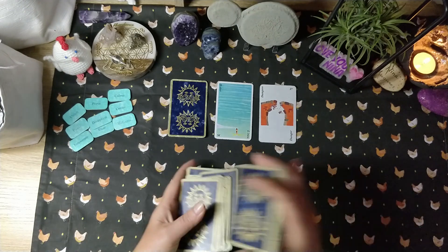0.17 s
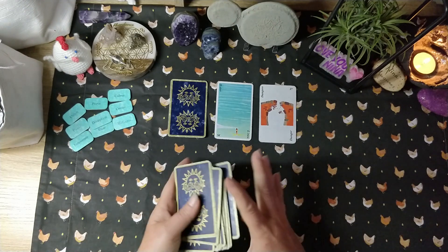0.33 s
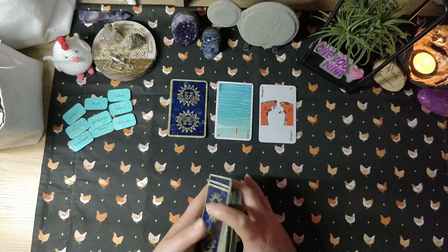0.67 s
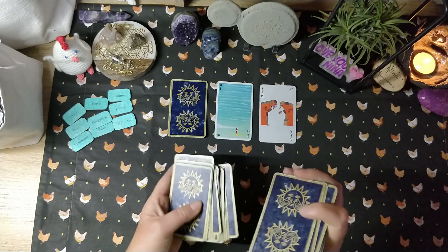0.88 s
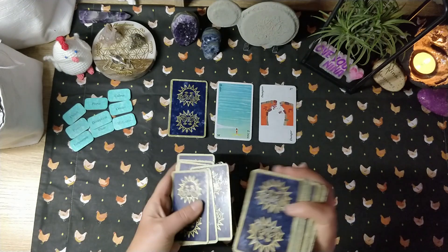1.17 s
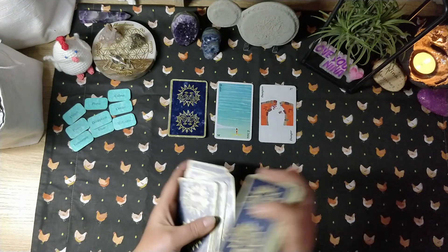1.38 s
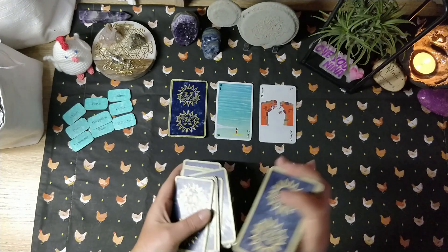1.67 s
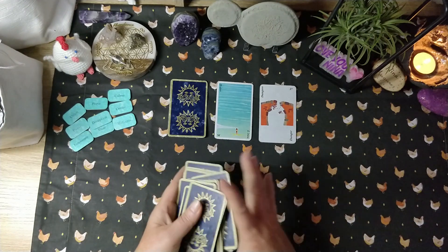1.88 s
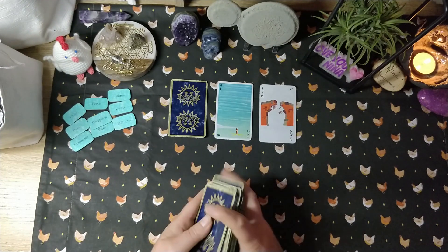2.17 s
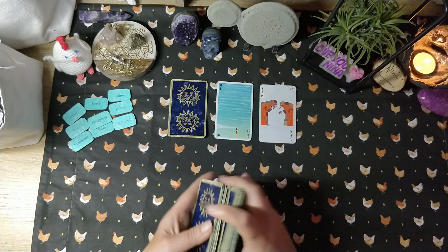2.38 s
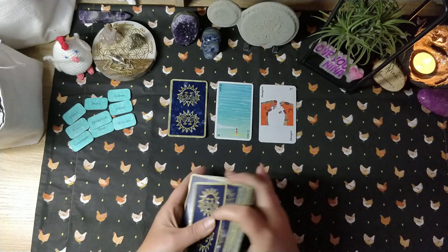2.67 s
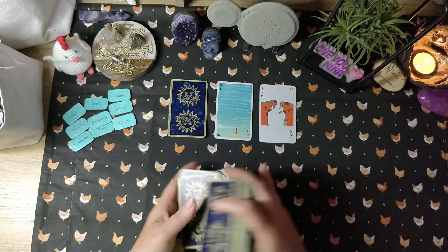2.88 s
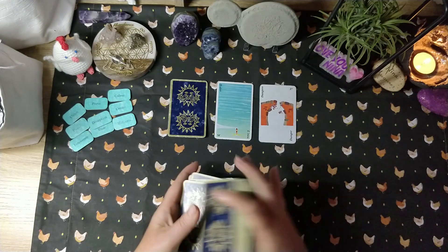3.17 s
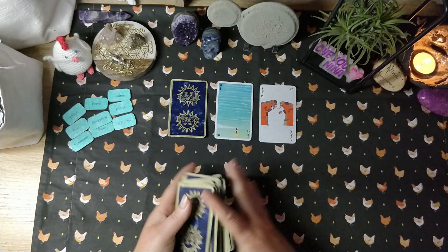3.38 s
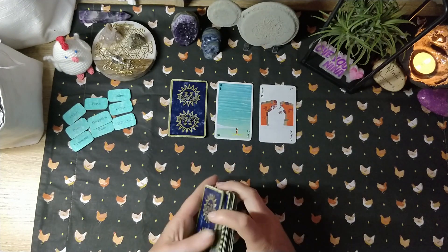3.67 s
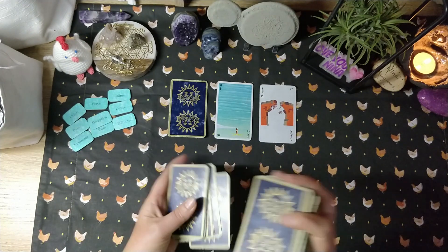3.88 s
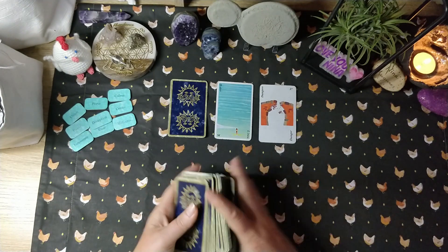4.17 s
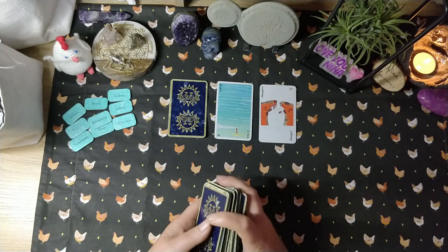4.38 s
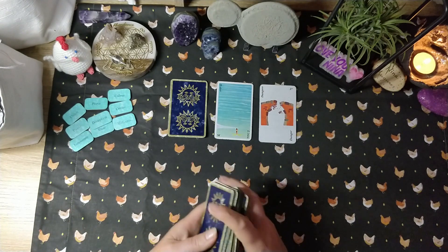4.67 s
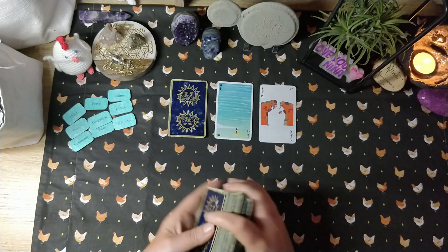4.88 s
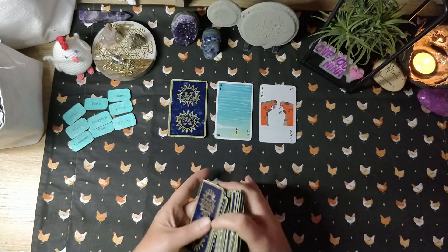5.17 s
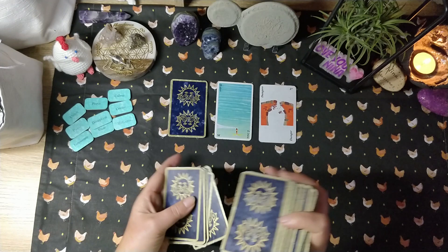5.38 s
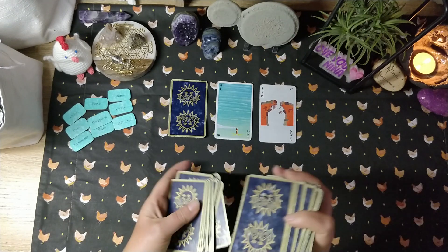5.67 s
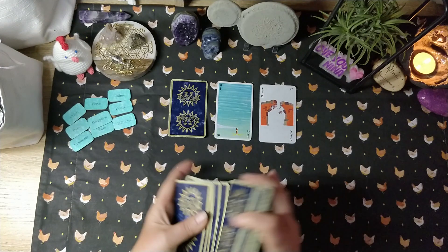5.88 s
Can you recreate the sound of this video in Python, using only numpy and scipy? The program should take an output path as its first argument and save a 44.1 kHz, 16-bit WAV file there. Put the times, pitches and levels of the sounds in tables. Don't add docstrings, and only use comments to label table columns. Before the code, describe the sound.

Two hands shuffle a stiff deck of cards close to the microphone in a small quiet room. Packets land with sharp, hollow slaps in irregular clusters, preceded by quick grainy slides. Corners tick past fingers and heavier drops knock the deck and palm. The middle is busiest; after four seconds comes a softer stretch of faint ticks, then hard slaps return at the end.

```python
import sys
import numpy as np
from scipy import signal
from scipy.fft import rfft, irfft
from scipy.io import wavfile
from scipy.ndimage import uniform_filter1d

SR = 44100
rng = np.random.default_rng(int(sys.argv[2]) if len(sys.argv) > 2 else 0)


def wav_out(sig):
    wavfile.write(sys.argv[1], SR, np.round(np.clip(np.atleast_2d(sig).T, -1, 1) * 32767).astype(np.int16))


def level_to_linear(level):
    exponent = np.asarray(level, float) / 20
    return 10 ** exponent


N = 266143


def band(x, lo_hz, hi_hz, order=2):
    edges_hz = [lo_hz, min(hi_hz, .45 * SR)]
    return signal.sosfilt(signal.butter(order, edges_hz, "band", fs=SR, output="sos"), x)


def ring(x, hz, width_hz):
    r = np.exp(-np.pi * width_hz / SR)
    return signal.lfilter([1 - r, 0, r - 1], [1, -2 * r * np.cos(2 * np.pi * hz / SR), r * r], x)


def unit(x):
    return x / np.sqrt(np.mean(x ** 2))


def crest(x):
    return x / np.sqrt(2 * uniform_filter1d(x ** 2, size=66).max())


def walk(rate):
    k = int(SR / rate)
    return unit(uniform_filter1d(uniform_filter1d(rng.standard_normal(N), k), k))


def curve(table, column):
    rows = np.array(table)
    return np.interp(np.arange(N) / SR, rows[:, 0], rows[:, column])


def add(out, start_s, x):
    i = max(int(start_s * SR), 0)
    out[i:i + len(x)] += x[:len(out) - i]


def airy(x):
    humps = level_to_linear(9.5) * ring(x, 6495, 1370) + level_to_linear(0.5) * ring(x, 8570, 1300)
    return humps + level_to_linear(-11.0) * band(x, 9200, 20000)


# pitch_hz, level_db [dB per Hz]
STILL_AIR = [(18, -18.5), (30, -8.5), (98, -5), (260, -15), (400, -14.5), (979, -15.5), (14800, -62),
             (16500, -55.5)]
# pitch_hz, width_hz, level_db
DRONES = [(132, 2.8, -66.5), (184.4, 12, -74)]


def room_tone():
    hz, (air_hz, air_db) = np.fft.rfftfreq(N, 1 / SR), np.transpose(STILL_AIR)
    shape = level_to_linear(np.interp(np.log(hz + 1), np.log(air_hz), air_db))
    air = irfft(rfft(rng.standard_normal(N)) * shape, N)
    mains_phase = 2 * np.pi * np.cumsum(50 + 0.94 * walk(4)) / SR
    mains = level_to_linear(-55.5 + 1.9 * walk(5)) * np.sin(mains_phase)
    drones = np.zeros(N)
    for pitch_hz, width_hz, level_db in DRONES:
        drone = ring(ring(rng.standard_normal(N), pitch_hz, width_hz), pitch_hz, width_hz)
        drones += level_to_linear(level_db) * unit(drone)
    return level_to_linear(-58.5 + 1.0 * walk(6.3)) * unit(air) + mains + drones


# start_s, speeding_up_ms, level_db, hiss_db [against level]
PUSHES = [(0.0, 55.4, -29.5, -5.5), (0.758, 38, -55, 1.5), (0.813, 29, -37.5, -4), (1.114, 30, -41, 0),
          (1.332, 33, -42.5, 6.5), (1.548, 100, -37, -23), (2.118, 40.3, -48.5, 2), (2.438, 46, -38.5, -1),
          (2.691, 50.4, -27.5, -10.5), (2.967, 12.6, -27.5, -25), (3.195, 4.9, -31.5, -5.5),
          (3.367, 21.6, -45, -1.5), (3.689, 87, -60.5, 7), (3.775, 23, -35, -1), (4.174, 53, -51.5, -1),
          (4.502, 42.3, -62, 12.5), (4.842, 31, -65, -4), (5.273, 39.5, -34, -4.5), (5.539, 75, -36.5, -24),
          (5.788, 28, -37, -1.5)]
# start_s, slowing_down_ms, level_db, hiss_db [against level]
DRAGS = [(0.387, 47, -48.5, 0.5), (1.001, 16.5, -33, -12), (1.052, 95, -45, -6.5), (1.809, 7, -37, -18),
         (1.837, 64, -50, -30.5), (2.009, 23, -42.5, -5), (2.988, 23, -37.5, -4), (3.227, 43, -44.5, -13),
         (4.267, 23, -58, 9.5), (4.308, 13, -49.5, -24), (4.44, 99, -60.5, -19), (4.876, 83, -51.5, -5.5),
         (5.107, 62, -50.5, -9), (5.228, 52, -59.5, 4), (5.495, 12, -34, -15), (5.722, 16, -80, 10),
         (5.832, 80, -40, -9)]
# start_s, length_ms, level_db, hiss_db [against level]
SWEEPS = [(0.517, 84, -53, -4), (2.181, 26, -55, 0), (3.476, 90, -62, 3), (4.06, 240, -63, -21.5),
          (4.636, 39, -56.5, 6), (0.44, 170, -67.5, -2), (1.7, 72, -63.5, -0.5), (2.06, 66, -60, -2.5),
          (2.385, 82, -71.5, 12), (4.752, 58, -72, 6.5), (4.964, 40, -56.5, 7.5), (5.018, 133, -56, -7)]


def strokes():
    rows = []
    for s, ms, db, hiss_db in PUSHES:
        touch_db = 0.5 - 0.03 * (db + 52.5)
        rows.append((s, ms, 2.1, db, hiss_db, touch_db))
    for s, ms, db, hiss_db in DRAGS:
        rows.append((s, 1.6, ms, db, hiss_db, -22.5))
    for s, ms, db, hiss_db in SWEEPS:
        rows.append((s, 0.5 * ms, 0.5 * ms, db, hiss_db, 6.5))
    return rows


# start_s, level_db
FUMBLE = [(0.0, -35.5), (0.57, -57.5), (0.84, -49.5), (1.23, -50.5), (1.39, -41.5), (1.51, -48),
          (2.05, -49), (2.2, -81.5), (2.6, -46.5), (2.85, -33.5), (3.01, -47), (3.41, -51.5), (3.76, -63),
          (3.93, -37), (4.08, -52.5), (5.1, -57), (5.55, -41.5), (6.03, -58)]
# pitch_hz, width_hz, level_db
PAPER = [(1481, 81, 0), (2100, 630, -2.5), (2950, 540, -9), (3950, 520, -12)]


def slides():
    gains = level_to_linear(curve(FUMBLE, column=1) - 16.0 + 2.0 * walk(49) + np.array([[0], [-.1], [-5]]))
    for start_s, rise_ms, fall_ms, level_db, hiss_db, touch_db in strokes():
        ms = np.arange(int((rise_ms + fall_ms + 22) * SR / 1000)) * 1000 / SR
        moments_ms = [0, rise_ms, rise_ms + fall_ms, ms[-1]]
        speed_db = np.interp(ms, moments_ms, [touch_db - 17.5, 0, -6, -24])
        stroke = np.minimum(ms / 12.0, 1) * level_to_linear(level_db + 2.5 + speed_db)
        shares_db = (-.3 * hiss_db - 5.0, 0.4 * hiss_db - 0.5, hiss_db)
        for gain, share_db in zip(gains, shares_db):
            add(gain, start_s, stroke * level_to_linear(share_db))
    grip_db = 2.8 * walk(110)
    rub = rng.standard_normal(N) * level_to_linear(grip_db + 0.72 * walk(550))
    skim = rng.standard_normal(N) * level_to_linear(grip_db + 0.72 * walk(550))

    def rustle(resonances):
        return unit(sum(level_to_linear(db) * ring(rub, hz, width_hz) for hz, width_hz, db in resonances))

    return gains[0] * rustle(PAPER[:2]) + gains[1] * rustle(PAPER[2:]) + gains[2] * unit(airy(skim))


# start_s, pocket_db [peak], pocket_hz, edge_db [against pocket], crack_db [against pocket]
LONG_EDGE = [(0.2489, -18, 2260, 5.5, -2.5), (0.2499, -19.5, 2190, -29, 3.5), (1.005, -28, 1800, -2, -5),
             (1.0474, -26.5, 1930, 3, -4), (1.1291, -13.5, 1060, -0.5, -1), (1.288, -13, 1900, -3, -5.5),
             (1.326, -24.5, 1880, 4.5, -0.5), (1.5998, -26, 2030, 6, -1.5), (1.6213, -29, 1730, -11, -7),
             (2.48, -18, 2184, 6.5, -3.5), (2.6302, -14, 1710, 4.5, -2), (2.6708, -18, 2350, 6, -34),
             (2.6804, -15, 2304, -25, -4.5), (2.7287, -12, 2160, 7, 5), (2.9026, -15.5, 2100, 1.5, -9),
             (2.9794, -16, 1620, -4, -8.5), (3.9856, -16, 1800, -3.5, -13.5), (3.991, -21, 2270, 5.5, -1.5),
             (5.3069, -14, 2020, 7, -25), (5.4958, -22.5, 1950, -3.5, -8), (5.5355, -24, 1940, -0.5, -2),
             (5.8184, -14.5, 2100, 5.5, -34), (5.9079, -14.5, 1745, 7, -0.5), (5.911, -11.5, 2100, -23, -3)]
# start_s, pocket_db [peak], pocket_hz, edge_db [against pocket], crack_db [against pocket]
SHORT_EDGE = [(0.0029, -23, 1800, 0.5, -8), (0.0248, -20.5, 2030, -33, -15), (0.0449, -16, 2360, 3, -7),
              (0.0567, -25, 1450, -9, -4), (0.8331, -20, 2070, 4, -2), (1.1278, -13.5, 1910, -2.5, -22.5),
              (1.3298, -19, 1890, 0, -3), (1.3605, -40, 2250, 10, 19), (1.372, -16, 1680, 4.5, 0),
              (1.5488, -26, 2100, 0, -3.5), (1.6323, -10, 2050, -7, -12), (1.8304, -20.5, 2090, 4, 3),
              (2.476, -26.5, 2240, 14.5, -3.5), (2.484, -23, 1410, 7.5, 8), (2.894, -35.5, 2100, 6, 3.5),
              (2.9101, -9.5, 1995, -3, -8), (3.2067, -16.5, 2100, -3.5, -5), (3.2194, -22, 1900, 2.5, 4.5),
              (3.79, -7.5, 1800, -1, -10.5), (3.7925, -21.5, 1770, -20, -10), (5.5712, -34, 1600, -7.5, 0),
              (5.5981, -20, 1400, 4, 0), (5.797, -25.5, 2130, -2, -10), (5.8047, -15.5, 1850, -4.5, -12.5)]
# start_s, pocket_db [peak], edge_hz, edge_db [against pocket]
FLICKS = [(0.389, -54, 2950, 17.5), (0.5782, -46.5, 3900, 10), (0.7333, -47, 4100, 1.5),
          (0.741, -45, 2920, 0.5), (1.042, -32, 2960, -1), (1.062, -39, 3320, 8), (1.1317, -25, 3340, 5.5),
          (1.5945, -27.5, 2920, 4.5), (1.811, -38, 4340, 1), (1.817, -40, 5360, -10),
          (1.872, -38, 2800, 13), (2.011, -56, 3700, 16), (2.149, -38, 4300, 0.5), (2.375, -39.5, 4180, 4),
          (2.6246, -31, 5240, 1), (2.718, -39, 2820, 22), (2.998, -30, 3220, 9), (3.026, -41, 4030, 11.5),
          (3.9788, -31, 2960, 2), (4.1766, -46.5, 2790, 10), (4.2318, -54, 2800, 17),
          (4.3218, -40, 4140, 8.5), (4.4993, -39.5, 4670, 4), (4.91, -52.5, 3000, 17),
          (5.076, -36.5, 3830, 3.5), (5.1247, -53, 3100, 11), (5.173, -41, 3340, 5), (5.23, -44, 2900, 7.5),
          (5.5884, -40, 3770, 10), (5.878, -31, 2950, 5)]
# start_s, pocket_db [peak], pocket_hz
STRAGGLERS = [(0.012, -32, 2020), (0.037, -44, 1850), (0.068, -31, 1930), (1.5809, -28.5, 1510),
              (2.711, -32, 1270), (3.371, -44, 2740), (3.6955, -52.5, 2100), (4.003, -16.5, 2090),
              (4.21, -49, 2690), (4.2835, -45, 2170), (4.4643, -46, 2150), (4.839, -53, 1840),
              (5.302, -23, 1530), (5.319, -17.5, 1330), (5.4922, -31, 1880), (5.608, -19.5, 2610),
              (5.789, -30, 1690), (5.8125, -16.5, 2100), (5.851, -28, 1800), (6.018, -40, 2000)]


def landings():
    rows = []
    for table, edge_hz in ((LONG_EDGE, 2990), (SHORT_EDGE, 3955)):
        for s, db, pocket_hz, edge_db, crack_db in table:
            rows.append((s, db, pocket_hz, edge_hz, edge_db, crack_db))
    for s, db, edge_hz, edge_db in FLICKS:
        rows.append((s, db, 2090, edge_hz, edge_db, 0.42 * edge_db))
    for s, db, pocket_hz in STRAGGLERS:
        rows.append((s, db, pocket_hz, 3500, -1, -15))
    return sorted(rows)


def slaps(packets, blur):
    out, t = np.zeros(N), np.arange(1200) / SR
    noise, chance = rng.standard_normal((2, len(packets), 1200))
    landing = (1 - np.exp(-t / .0006)) * np.exp(-t / .0011)
    contacts = noise * level_to_linear(4.97 * chance) * landing
    contacts = (1 - blur) * contacts + blur * (t == t[30])
    low = band(contacts, 1100, 2900, order=3)
    mid = band(contacts, 2355, 4290, order=3)
    hump, top = ring(contacts, 5100, 1100), airy(contacts)
    flex = band(contacts, 370, 4700, order=3)
    for k, (start_s, level_db, pocket_hz, edge_hz, edge_db, crack_db) in enumerate(packets):
        pocket = crest(ring(ring(flex[k], pocket_hz, 300 + 250 * blur), pocket_hz, 880))
        pocket = crest(pocket + level_to_linear(-13) * crest(low[k]))
        edge = crest(ring(flex[k], edge_hz, 400 + 350 * blur))
        edge = crest(edge + level_to_linear(-5.5) * crest(mid[k]))
        hard_db = crack_db - max(edge_db, 0)
        crack = crest(crest(hump[k]) + level_to_linear(0.31 * hard_db + 6.5) * crest(top[k]))
        slap = pocket + level_to_linear(edge_db) * edge + level_to_linear(crack_db) * crack
        add(out, start_s - .001, level_to_linear(level_db) * slap)
    return out


# delay_ms, level_db
ECHOES = [(9.6, -14), (12.3, -14), (17.5, -21.5), (21.2, -22.5), (31, -47.5)]


def echoes(x):
    t, reply = np.arange(120) / SR, np.zeros(2000)
    for delay_ms, level_db in ECHOES:
        smear = rng.standard_normal(120) * np.exp(-t / 0.000037)
        add(reply, delay_ms / 1000, level_to_linear(level_db) * smear / np.linalg.norm(smear))
    return signal.fftconvolve(x, reply)[:N]


# pitch_hz, t60_s, level_db
TAIL = [(244, 0.42, -23), (661, 0.26, -13.5), (1800, 0.38, -24), (3640, 0.17, -18.5), (8000, 0.35, -21.5),
        (13240, 0.071, -7.5)]


def tail(x):
    t, reply = np.arange(int(.6 * SR)) / SR, 0
    build_up = 1 - np.exp(-(t / 0.0013) ** 2)
    for pitch_hz, t60_s, level_db in TAIL:
        noise = band(rng.standard_normal(len(t)), pitch_hz / 1.82, pitch_hz * 1.76)
        decay = np.exp(-np.log(1000) * t / t60_s)
        reply = reply + level_to_linear(level_db - 19.5) * noise * build_up * decay
    return signal.fftconvolve(x, reply)[:N]


# start_s, level_db [peak], pitch_hz
KNOCKS = [(0.0244, -70, 775), (0.0443, -44.5, 645), (0.2483, -43.5, 560), (0.8334, -41, 677),
          (1.045, -46.5, 396), (1.128, -29, 930), (1.287, -39, 365), (1.3286, -41.5, 640),
          (1.3613, -37, 600), (1.6217, -46, 880), (1.8314, -41, 880), (2.4758, -43, 880),
          (2.6301, -42, 382), (2.6708, -44.5, 403), (2.719, -37.5, 377), (2.9029, -42.5, 970),
          (2.9772, -42.5, 393), (3.2069, -43, 460), (3.79, -26.5, 406), (3.9835, -40.5, 404),
          (5.3082, -35, 443), (5.5979, -36, 640), (5.8052, -45, 650), (5.909, -30, 597)]
# pitch_hz, width_hz, level_db
TABLE_TOP = [(404, 28, -3.5), (536, 29, -10), (600, 42, -0.5), (880, 46, -2.5), (1135, 32, -15.5)]


def knocks():
    out, t = np.zeros(N), np.arange(2400) / SR
    blow = (1 - np.exp(-t / 0.00087)) * np.exp(-t / 0.0017)
    for start_s, level_db, pitch_hz in KNOCKS:
        push = rng.standard_normal(2400) * blow
        deck = crest(ring(push, pitch_hz, 57)) + level_to_linear(0.5) * crest(band(push, 220, 830))
        table = sum(level_to_linear(db) * crest(ring(push, hz, width_hz)) for hz, width_hz, db in TABLE_TOP)
        add(out, start_s - .001, level_to_linear(level_db + 10.0) * crest(deck + level_to_linear(4.5) * crest(table)))
    return out


# start_s, level_db [peak], pitch_hz
THUMPS = [(0.046, -56, 138), (0.249, -53, 94), (0.83, -57, 130), (2.484, -53, 129), (2.979, -62, 150),
          (1.127, -34, 124), (1.288, -48.5, 119), (1.633, -50, 123), (2.731, -46.5, 119),
          (3.206, -54.5, 125), (3.789, -50.5, 104.5), (5.308, -42, 115), (5.904, -51, 116)]


def thumps():
    out, t = np.zeros(N), np.arange(6000) / SR
    swell = (1 - np.exp(-t / 0.0005)) * np.exp(-t / 0.012)
    for start_s, level_db, pitch_hz in THUMPS:
        add(out, start_s, level_to_linear(level_db + 12.5) * swell * np.sin(2 * np.pi * pitch_hz * t))
    return out


# start_s, level_db
# [peak], pitch_hz
SNAPS = [(0.2497, -11.5, 4500), (1.1302, -13, 3160), (1.3725, -12, 3000), (1.633, -9.5, 1980),
         (2.3755, -37, 5000), (2.6306, -10, 3060), (2.7285, -7, 3600), (2.739, -17.5, 6300),
         (3.7922, -11.5, 1820), (3.803, -20, 2800), (4.3222, -37, 4300), (4.4992, -37, 4600),
         (5.076, -29.5, 3530), (5.5977, -17, 4060), (5.8058, -19, 1720), (5.819, -10.5, 4060),
         (5.9121, -13, 1900)]


def snaps():
    out, t, step_s = np.zeros(N), np.arange(500) / SR, .00007
    step = t / step_s * np.exp(-t / step_s)
    bright = level_to_linear(-10.5) * crest(band(step, 6000, 15000))
    for start_s, level_db, pitch_hz in SNAPS:
        note = crest(ring(step, pitch_hz, 0.33 * pitch_hz))
        add(out, start_s - .0004, level_to_linear(level_db) * (note + bright))
    return out


# start_s, level_db [peak],
# pitch_hz
TICKS = [(0.8255, -36, 4200), (1.1204, -32, 2800), (1.123, -28, 1300), (1.5714, -40, 1450),
         (1.5825, -27, 2900), (1.6104, -28, 1740), (1.6217, -21, 2840), (1.626, -22, 1930),
         (2.4508, -37, 4300), (2.4674, -34, 3640), (2.6364, -18, 2070), (2.6404, -17, 6200),
         (2.6655, -32, 3300), (2.6735, -19, 2130), (2.722, -18, 2100), (2.739, -17.5, 2880),
         (2.750, -23, 2700), (2.9224, -15, 1670), (3.7844, -33.5, 1780), (3.7955, -20, 2850),
         (3.802, -19, 1800), (4.1624, -50, 2140), (4.1814, -42, 2140), (4.195, -39, 2150),
         (4.2153, -35, 2960), (4.233, -39, 2700), (4.2574, -39, 2210), (4.2784, -46, 3880),
         (4.285, -37, 4300), (4.3114, -44, 2100), (4.42, -50, 2600), (4.4458, -44, 2120),
         (4.4924, -40, 2600), (4.509, -37.5, 1260), (4.6434, -55, 6440), (4.6518, -45, 6480),
         (4.8833, -46, 2140), (4.9806, -42, 4570), (5.0394, -50, 3700), (5.1158, -39, 2780),
         (5.1652, -37, 1970), (5.499, -22.5, 1890), (5.5074, -38, 1900), (5.5164, -34, 1990),
         (5.5367, -21.5, 1900), (5.5494, -28, 1850), (5.5784, -36, 2200), (5.5904, -25.5, 3970),
         (5.8004, -25, 1800), (5.8144, -13.5, 2160), (5.8284, -17, 2630), (5.8404, -26, 2040),
         (5.8554, -29, 1850)]


def ticks():
    out, t = np.zeros(N), np.arange(900) / SR
    drag = (1 - np.exp(-t / .0006)) ** 2 * np.exp(-t / .0013)
    for start_s, level_db, pitch_hz in TICKS:
        push = rng.standard_normal(900) * drag
        note = ring(ring(push, pitch_hz, 0.2 * pitch_hz), pitch_hz, 0.4 * pitch_hz)
        snap = level_to_linear(-8.5) * crest(band(push, 1900, 12000))
        add(out, start_s - .001, level_to_linear(level_db - 2.5) * (crest(note) + snap))
    return out


# start_s, pitch_hz, level_db
SQUEAK = [
    (3.891, 11000, -60),
    (3.894, 11000, -42),
    (3.897, 9700, -39.5),
    (3.902, 8150, -33),
    (3.9045, 8240, -45),
    (3.907, 8000, -52),
]


def squeak():
    t = np.arange(N) / SR
    on = (t > SQUEAK[0][0]) & (t < SQUEAK[-1][0])
    pitch_hz = curve(SQUEAK, column=1) + 220 * walk(600)
    whistle = np.sin(2 * np.pi * np.cumsum(pitch_hz) / SR)
    return on * level_to_linear(curve(SQUEAK, column=2) + 3.4 * walk(700)) * whistle


def scene():
    packets = landings()
    ahead = slaps(packets, blur=0)
    front = level_to_linear(2.0) * slaps(packets[::2], blur=0.86)
    back = level_to_linear(2.0) * slaps(packets[1::2], blur=0.86)
    rest, whistle = knocks() + thumps() + slides(), squeak()
    aside = rest + level_to_linear(-17) * whistle
    corners = ticks() + snaps()
    room = echoes(level_to_linear(-5.0) * (ahead + front + back) + aside)
    room += tail(front + aside) + tail(back)
    room += echoes(corners) + tail(level_to_linear(-2.0) * corners)
    return (ahead + rest + whistle + corners + room + room_tone())[None]


def band_limit(x):
    return signal.sosfilt(signal.butter(12, 16820, fs=SR, output="sos"), x)


def record(dry):
    hiss = level_to_linear(-70.5) * unit(band(rng.standard_normal(dry.shape), 5300, 17200))
    x = signal.sosfilt(signal.butter(4, 40, "high", fs=SR, output="sos"), dry + hiss)
    x = signal.sosfilt(signal.ellip(8, .3, 50, 15900, fs=SR, output="sos"), x)
    x = x / (1 + (x / 1.1) ** 4) ** (1 / 4)
    return band_limit(x)


dry = scene()
out = record(dry)
wav_out(out)
```